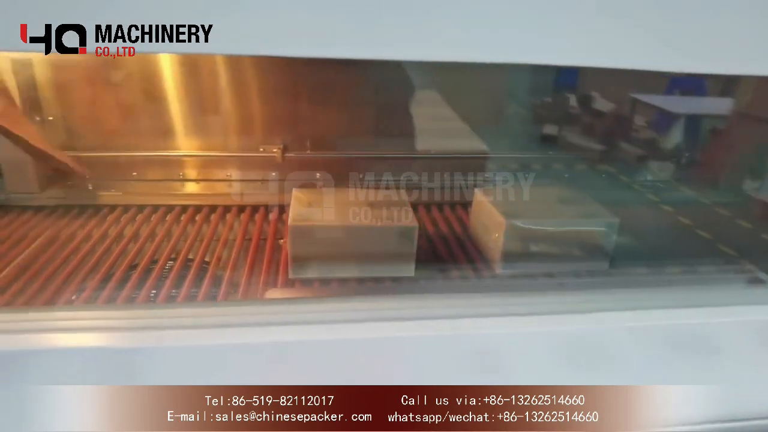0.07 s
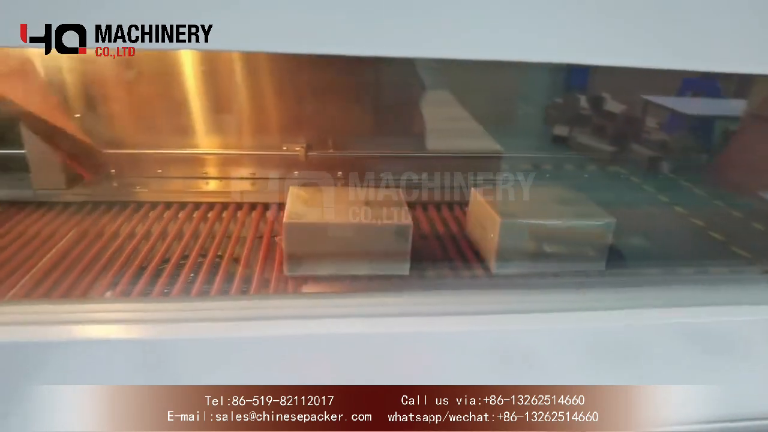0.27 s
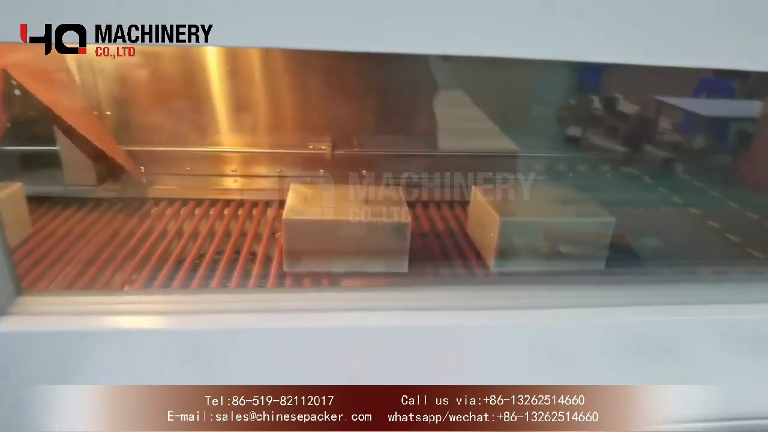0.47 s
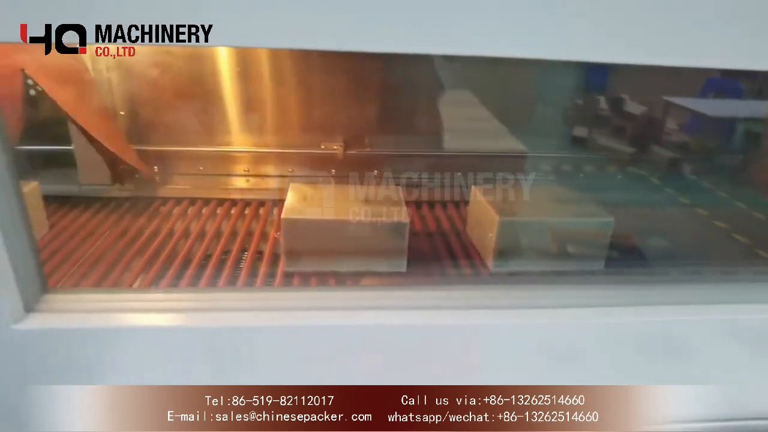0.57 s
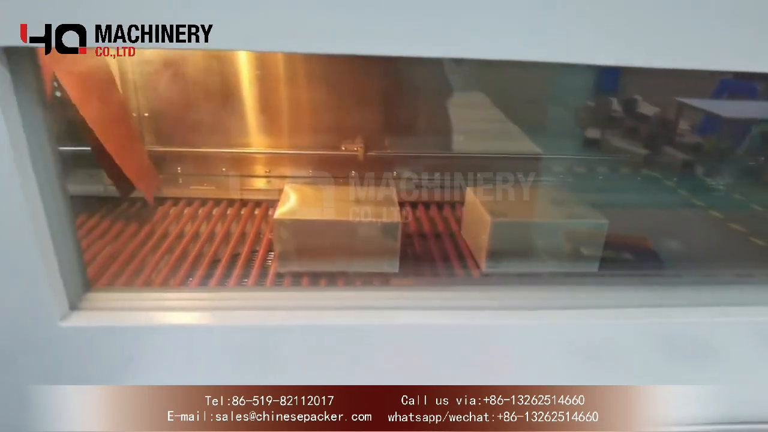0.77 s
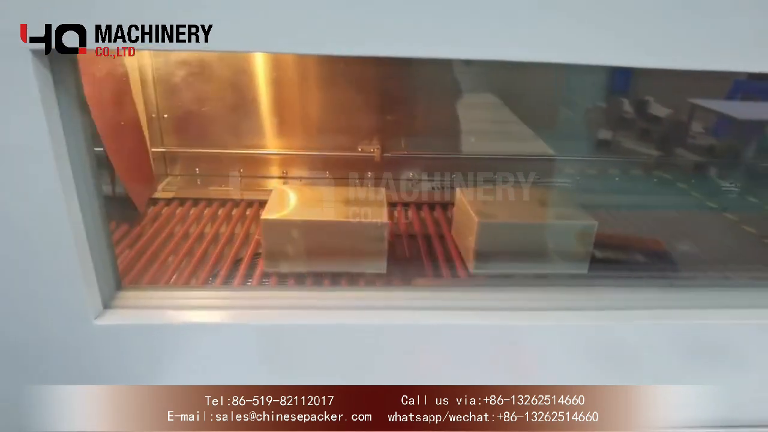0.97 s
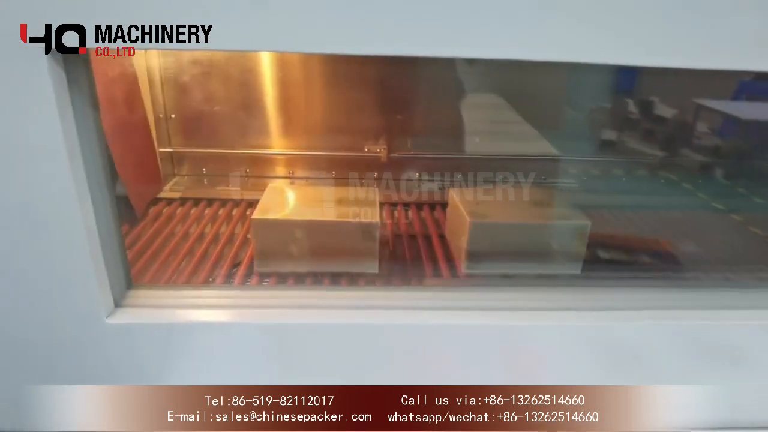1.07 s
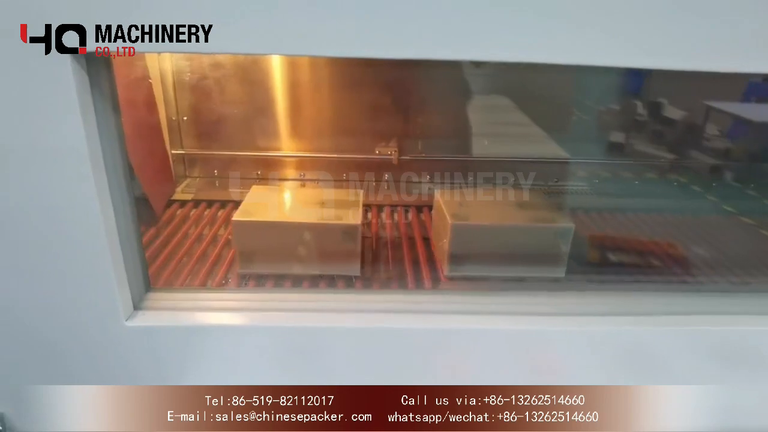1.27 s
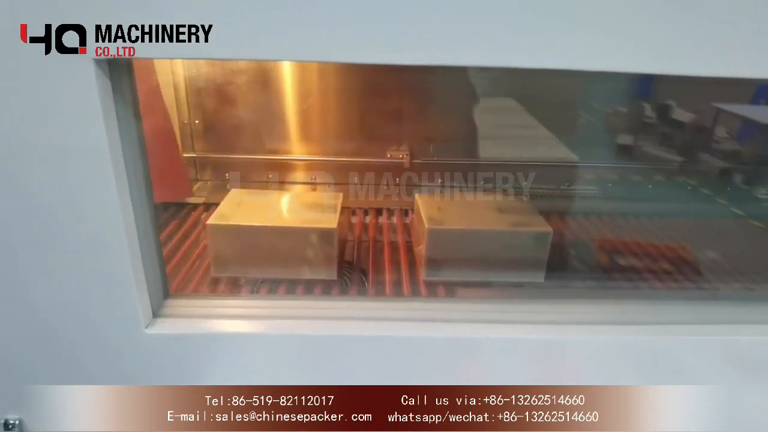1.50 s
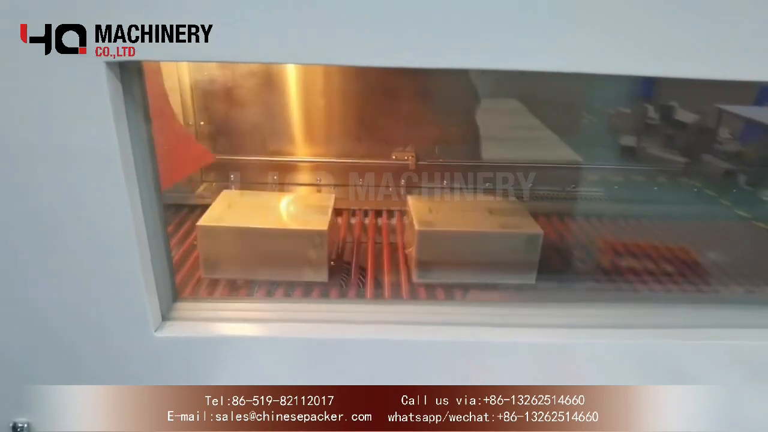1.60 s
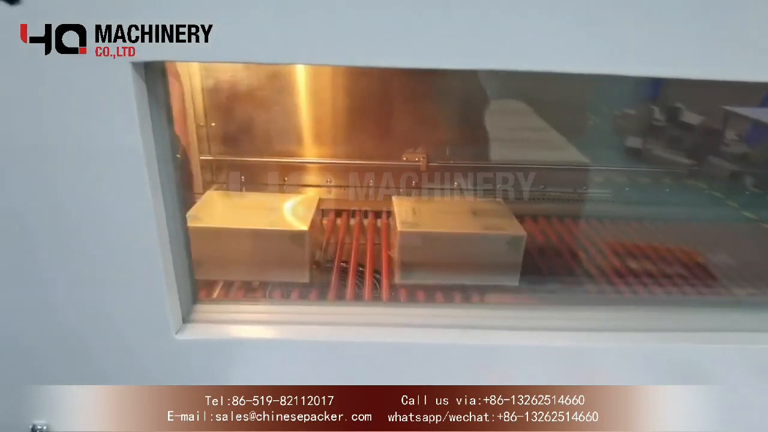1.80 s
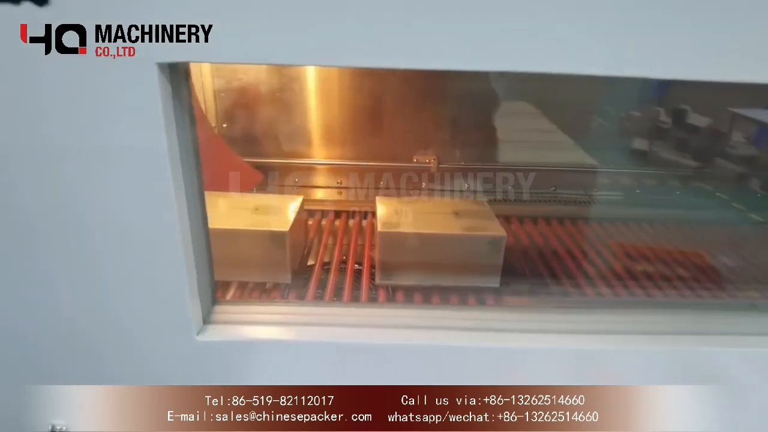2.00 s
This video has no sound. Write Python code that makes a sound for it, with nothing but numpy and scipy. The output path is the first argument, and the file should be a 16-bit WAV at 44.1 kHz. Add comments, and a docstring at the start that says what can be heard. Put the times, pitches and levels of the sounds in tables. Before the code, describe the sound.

A shrink-wrapping machine lets out a pneumatic hiss, with a dull thud partway through. The air fades away, then a few soft sheet-metal knocks follow over the steady low rumble of its blower and conveyor in a factory hall.

```python
"""A dull knock sounds over the steady rumble of a shrink-wrapping machine's blower and conveyor.
A valve lets a turbulent jet into a cylinder, the sealing bar lands with a thud that shakes the frame,
and the exhaust hisses away through a hollow, drifting resonance. More knocks excite the modes of the
sheet-metal housing. Steel panels reflect the air noise, and the factory hall reverberates."""
import sys
import numpy as np
from scipy import signal
from scipy.fft import rfft, irfft, next_fast_len
from scipy.io import wavfile
from scipy.ndimage import map_coordinates

SR = 44100
rng = np.random.default_rng(int(sys.argv[2]) if len(sys.argv) > 2 else 0)


def digitize_waveform(pressure):
    """Quantize a signal to 16-bit integers and store it at the path in sys.argv[1].

    Rows of a 2-D input are taken as channels; values are limited to [-1, 1].
    """
    field = np.atleast_2d(pressure).T
    bounded = np.clip(field, -1, 1)
    quanta = np.round(bounded * 32767).astype(np.int16)
    wavfile.write(sys.argv[1], SR, quanta)


N = 90404

# Air leaving the cylinder. Each row: time in seconds, flow level in dB, resonance in Hz.
EXHAUST_FLOW = [(.465, -55, 1949), (.487, -28, 1946), (.52, -28.5, 1985), (.55, -22.5, 2000),
                (.59, -22.5, 2150), (.655, -23.5, 2600), (.81, -27, 2537), (.94, -31.5, 2150),
                (1.055, -30.5, 2240), (1.08, -33, 2220), (1.15, -37.5, 2190), (1.21, -48.5, 2170),
                (1.4, -71, 2170)]
# Envelopes of the inlet jet, valve spit and blower air. Each row: time in seconds, level in dB.
JET_LEVEL = [(.11, -46.5), (.185, -42.5), (.215, -32.5), (.25, -27.5), (.315, -29), (.334, -19.5),
             (.356, -20.5), (.378, -25), (.46, -28), (.52, -27), (.62, -32.5)]
SPIT_LEVEL = [(.205, -45), (.228, -30), (.272, -27.5), (.295, -33), (.345, -35), (.4, -47.5)]
DRAUGHT_LEVEL = [(1.24, -44), (1.36, -46.5), (1.48, -44)]
# Spectra of the noise sources. Each row: frequency in Hz, relative level in dB.
EXHAUST_SPECTRUM = [(300, 1.5), (700, -19), (1100, -14), (1500, -10), (1900, -5.5), (3100, 0.5),
                    (4200, -3.5), (5600, -1.5), (8500, 0.5), (10000, -7), (12000, -14), (14000, -21)]
JET_SPECTRUM = [(400, -4.5), (1400, -13.5), (3000, -8), (4500, -3), (5700, -0.5), (8100, 4), (10000, -1.5),
                (12000, -11.5), (14000, -14.5)]
SPIT_SPECTRUM = [(150, -22), (280, 0.5), (650, 1), (1250, -3), (1750, 1), (2130, 10.5), (2850, -5),
                 (3180, 5), (3800, -6), (9000, -29)]
SHUDDER_SPECTRUM = [(70, -5), (110, 1.5), (185, 3), (300, -4), (380, -23), (800, -17), (2000, -37)]  # the shaken frame
RATTLE_SPECTRUM = [(80, -38), (300, 16), (600, 4.5), (950, 0.5), (1500, -7.5), (6000, -65)]  # loose parts
RUMBLE_SPECTRUM = [(25, -27), (62, -12), (80, -12.5), (107, 0.5), (188, -4.5), (250, -10.5), (303, -2),
                   (360, -13.5), (500, -12.5), (900, -16), (1300, -24.5), (2000, -51)]  # blower and conveyor
DRAUGHT_SPECTRUM = [(700, -27), (1300, -2), (1700, 0), (2300, 4.5), (2900, -2), (3900, -3), (6100, -2.5),
                    (8500, -6.5), (10000, -12), (12000, -24), (14000, -38)]  # blower air
# Resonances of the air pipe. Each row: frequency in Hz, gain in dB.
PIPE_MODES = [(1860, 4.5), (1908, 2), (2360, 3.5), (2633, 4), (2852, 7), (5067, 5), (5712, 8.5), (6217, 7),
              (6833, 1), (9947, 7.5)]
# Air leaks. Each row: start in seconds, level in dB, centre in Hz, width in Hz, rise in seconds.
LEAKS = [(.195, -30.5, 8000, 700, 0.017), (.217, -30.5, 2230, 480, .018), (.268, -33.5, 925, 340, 0.005),
         (.478, -30.5, 1900, 240, 0.043), (.545, -34, 1404, 347, 0.019), (.523, -27, 6800, 4200, .025),
         (.58, -29, 5750, 1500, 0.084), (.573, -25.5, 2180, 710, 0.019), (1.135, -37.5, 2230, 347, 0.021),
         (1.262, -43, 5460, 2200, 0.0096), (1.655, -56, 10700, 4500, 0.052), (1.92, -49, 6150, 890, 0.035)]
# The bar's landing and rebound. Each row: start in seconds, level in dB, ratio on the mode frequencies.
BAR_IMPACTS = [(0.4698, -7, 1.04), (0.492, -11, 0.925)]
# Modes of the bar. Each row: frequency in Hz, relative level in dB, time to peak in seconds.
BAR_MODES = [(209.5, -1, 0.011), (143, -19.5, 0.022), (293, -34, 0.047)]
# Housing knocks. Each row: start in seconds, level in dB, tilt in dB per octave, relative rattle in dB.
HOUSING_KNOCKS = [(-.008, -22.5, -4, -21), (0.129, -32.5, 5, -2.5), (0.244, -28, 0.5, -10),
                  (0.311, -21.5, -6.5, -13), (0.377, -23, -16, -27), (1.479, -26, 3, -9.5),
                  (1.503, -22, 0, -9.5), (1.57, -26, -5, -40), (1.686, -19.5, -7.5, -17),
                  (1.74, -18.5, -3, -25), (1.868, -28.5, 2.5, -22), (1.925, -30, 1, -28)]
# Modes of the housing. Each row: frequency in Hz, relative level in dB, 60 dB decay time in seconds.
HOUSING_MODES = [(99.4, -7, 0.21), (118.9, -0.5, 0.23), (190.2, -8.5, 0.28), (238.7, -5, 0.14),
                 (310.1, -4, 0.18), (430, -23, 0.14), (640, -12.5, 0.094)]
# Reverberation of the hall. Each row: frequency in Hz, 60 dB decay time in seconds.
HALL_DECAY = [(100, 1), (220, 0.79), (1000, 0.4), (5000, 0.95), (14000, 0.6)]


def exhaust(flutter_db=0.87, full_flow_db=-20.5, treble_hz=8600, wide_hz=945, narrow_hz=390):
    """Turbulent noise dulls as the flow drops, while its hollow resonance narrows and stands out."""
    flow_db, centre_hz = curve(EXHAUST_FLOW, outside=-120), curve(EXHAUST_FLOW, column=2)
    excess_db = flow_db - full_flow_db  # negative below full flow
    hiss = noise(EXHAUST_SPECTRUM)
    treble = filtered(hiss, lambda hz: 1 - 1 / (1 + (hz / treble_hz) ** 6))
    hiss = amp(flow_db) * (hiss - treble + treble * amp(0.63 * excess_db))
    narrowness = np.clip(excess_db / -19.5, 0, 1)
    mean_hz = centre_hz.mean()
    ring = np.sqrt(narrowness) * band(mean_hz, narrow_hz)
    ring += np.sqrt(1 - narrowness) * band(mean_hz, wide_hz)
    drift = np.exp(2j * np.pi * np.cumsum(centre_hz - mean_hz) / SR)  # shifts the band to centre_hz
    hollow = (signal.hilbert(ring) * drift).real * amp(-29 + 0.58 * excess_db)
    return (hiss + hollow) * amp(flutter_db * wobble(80.53))


def inlet(flutter_db=0.46):
    """Turbulence at the opening valve makes a hollow spit and a bright jet that surges once."""
    jet = amp(curve(JET_LEVEL, outside=-120)) * noise(JET_SPECTRUM)
    spit = amp(curve(SPIT_LEVEL, outside=-120)) * noise(SPIT_SPECTRUM)
    return (jet + spit) * amp(flutter_db * wobble(67.9))


def pipe(hiss, width_hz=22):
    """Resonance in the pipe lifts narrow bands of the hiss into thin rings."""
    def response(hz):
        damping = 1j * hz * width_hz
        return 1 + sum((amp(db) - 1) * damping / (mode_hz ** 2 - hz ** 2 + damping)
                       for mode_hz, db in PIPE_MODES)
    return filtered(hiss, response)


def leaks():
    """Escaping air makes band-limited noise: half-whistled spurts that swell and fade."""
    out = np.zeros(N)
    for start, db, centre_hz, width_hz, rise_s in LEAKS:
        out += amp(db) * swell(since(start), rise_s) * band(centre_hz, width_hz)
    return out


def sealing_bar():
    """A cushioned impact excites low modes, each of which swells and dies away quickly."""
    out = np.zeros(N)
    for start, db, pitch in BAR_IMPACTS:
        t = since(start)
        for hz, mode_db, peak_s in BAR_MODES:
            out += amp(db + mode_db) * swell(t, peak_s) ** 2.6 * np.sin(2 * np.pi * hz * pitch * t)
    return out


def frame(ring_hz=190, ring_t60=0.93, shudder_t60=1.0, rise_s=0.012):
    """Free vibration keeps the frame humming and shuddering after the bar lands."""
    t = since(BAR_IMPACTS[0][0])
    ring = amp(-19.5 - 60 * t / ring_t60) * np.sin(2 * np.pi * ring_hz * t)
    shudder = amp(-24.5 - 60 * t / shudder_t60) * noise(SHUDDER_SPECTRUM)
    return (1 - np.exp(-t / rise_s)) * (ring + shudder)


def housing(attack_s=0.0065, rattle_t60=0.29, scatter_db=1.76):
    """Each knock excites the damped modes of the sheet metal and rattles loose parts."""
    out, lowest_hz = np.zeros(N), HOUSING_MODES[0][0]
    for start, db, tilt, rattle_db in HOUSING_KNOCKS:
        t, ring = since(start), np.zeros(N)
        for hz, mode_db, t60 in HOUSING_MODES:
            struck_db = mode_db + tilt * np.log2(hz / lowest_hz) + rng.normal(0, scatter_db)
            ring += amp(struck_db - 60 * t / t60) * np.sin(2 * np.pi * (hz * t + rng.random()))
        rattle = amp(rattle_db - 60 * t / rattle_t60) * noise(RATTLE_SPECTRUM)
        out += amp(db) * (1 - np.exp(-t / attack_s)) * (ring + rattle)
    return out


def blower_and_conveyor(rumble_db=-38.5, sway_db=1.6):
    """Random amplitude modulation makes the rumble uneven; a soft rush of air above it dips briefly."""
    rumble = amp(rumble_db + sway_db * wobble(18)) * noise(RUMBLE_SPECTRUM)
    return rumble + amp(curve(DRAUGHT_LEVEL)) * noise(DRAUGHT_SPECTRUM)


def panel_reflections(x, echo_gain, t60, drift_s=0.2004):
    """Echoes between steel panels interfere; their metallic grain shifts as the microphone moves."""
    t, out = np.arange(SR // 4) / SR, np.zeros(N)
    position = since(0) / drift_s  # one new echo pattern per step along the machine
    for spot in range(int(position[-1]) + 2):
        response = rng.standard_normal(len(t)) * amp(-60 * t / t60)
        response *= echo_gain / np.linalg.norm(response)
        response[0] += 1  # direct sound
        nearness = np.maximum(1 - np.abs(position - spot), 0)
        out += nearness * signal.fftconvolve(x, response / np.linalg.norm(response))[:N]
    return out


def hall(x, delay_s=0.02):
    """Diffuse reverberation decays exponentially, slowest in the bass."""
    hz, t, spectrum = signal.stft(rng.standard_normal(SR), SR, nperseg=256)
    spectrum *= amp(-60 * t / along(HALL_DECAY, hz)[:, None])
    tail = signal.istft(spectrum, SR, nperseg=256)[1]
    tail = np.pad(tail / np.linalg.norm(tail), (int(delay_s * SR), 0))
    return signal.fftconvolve(x, tail)[:N]


def amp(db):
    """Decibels to amplitude ratio."""
    return 10 ** (np.asarray(db) / 20)


def unit(x):
    """Normalisation to rms 1."""
    return x / np.sqrt(np.mean(x ** 2) + 1e-20)


def along(points, hz):
    """Interpolation on a logarithmic frequency axis."""
    knots_hz, values = np.transpose(points)
    return np.interp(np.log(hz + 1), np.log(knots_hz + 1), values)


def since(start):
    """Seconds since start, zero before it."""
    return np.maximum(np.arange(N) / SR - start, 0)


def swell(t, peak_s):
    """A critically damped pulse that reaches 1 at peak_s."""
    return t / peak_s * np.exp(1 - t / peak_s)


def curve(rows, column=1, outside=None):
    """Linear interpolation of one table column over time."""
    columns = np.transpose(rows)
    return np.interp(since(0), columns[0], columns[column], outside, outside)


def wobble(rate):
    """A smooth random curve with rate knots a second."""
    return map_coordinates(rng.standard_normal(int(N * rate / SR) + 4), [since(0) * rate])


def filtered(x, response):
    """Filtering multiplies the spectrum by a frequency response."""
    size = next_fast_len(N + SR // 2)
    return irfft(rfft(x, size) * response(np.fft.rfftfreq(size, 1 / SR)), size)[:N]


def noise(spectrum):
    """Spectrally shaped noise of rms 1, falling away below the first row."""
    def response(hz):
        return amp(along(spectrum, hz)) * np.minimum(hz / spectrum[0][0], 1) ** 2
    return unit(filtered(rng.standard_normal(N), response))


def band(centre_hz, width_hz):
    """Noise of rms 1 in one steep-sided resonance."""
    def response(hz):
        return 1 / np.sqrt(1 + ((hz - centre_hz) / (width_hz / 2)) ** 6)
    return unit(filtered(rng.standard_normal(N), response))


def scene():
    """Air, impacts, running noise and reverberation add by superposition."""
    air = panel_reflections(pipe(inlet() + exhaust()) + leaks(), echo_gain=0.56, t60=0.074)
    thud, knocks = sealing_bar(), housing()
    reverberation = hall(amp(-18.5) * air + amp(-13.5) * thud + amp(-8.5) * knocks)
    running = panel_reflections(blower_and_conveyor(), echo_gain=0.41, t60=0.066)
    return (air + thud + frame() + knocks + reverberation + running)[None]


def record(dry, low_hz=50, top_hz=14050):
    """The microphone acts as a band-pass filter, losing the deep bass and the highest treble."""
    return filtered(dry[0], lambda hz: (hz < top_hz) * (1 - 1 / (1 + (hz / low_hz) ** 4)))[None]


dry = scene()
out = record(dry)
digitize_waveform(out)
```